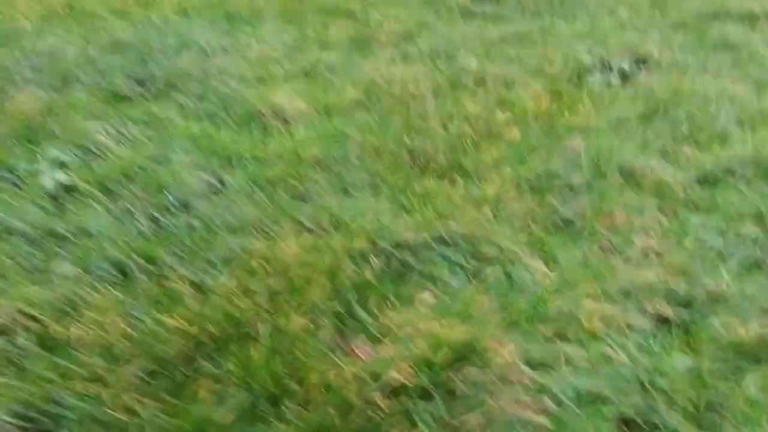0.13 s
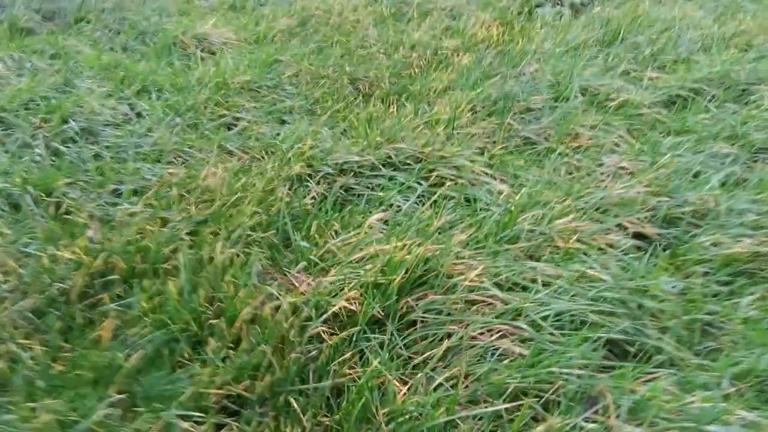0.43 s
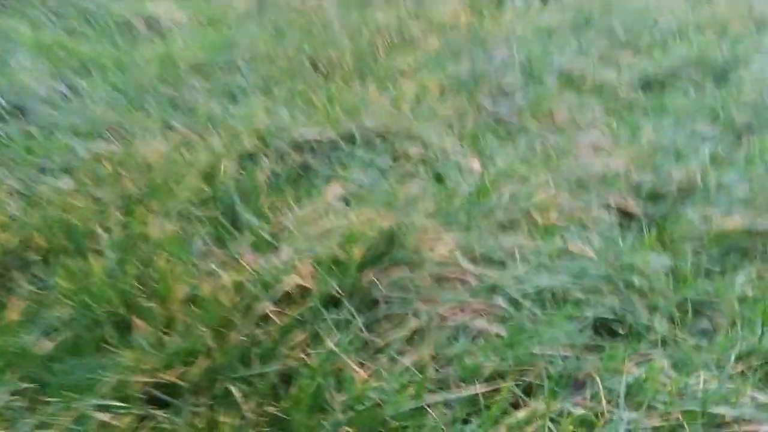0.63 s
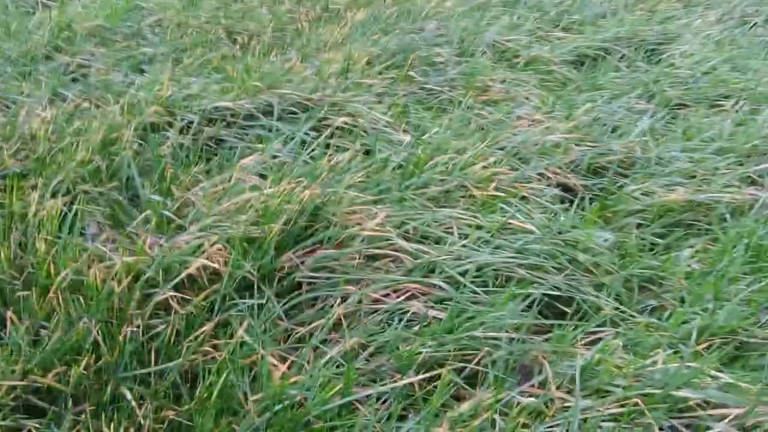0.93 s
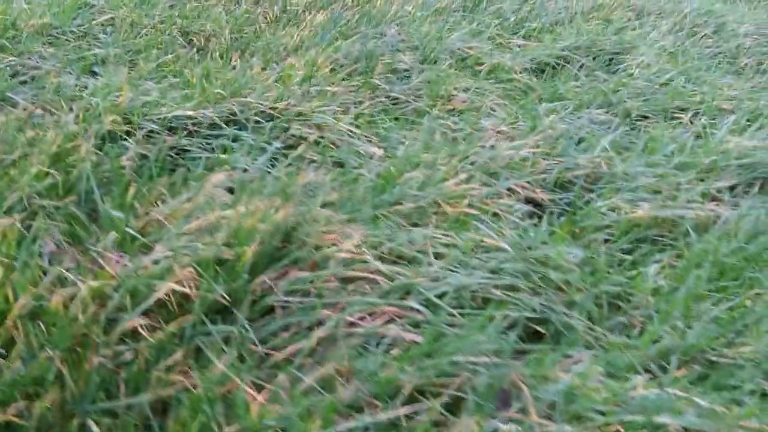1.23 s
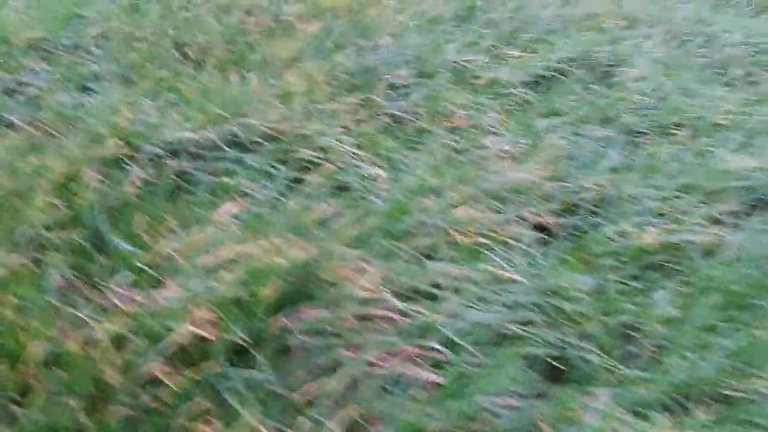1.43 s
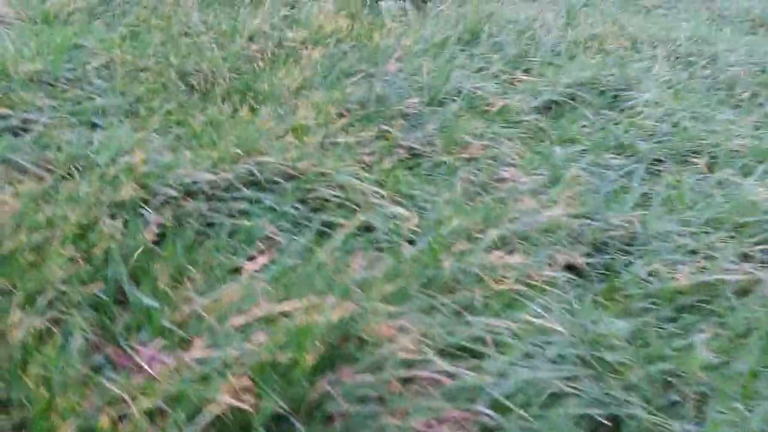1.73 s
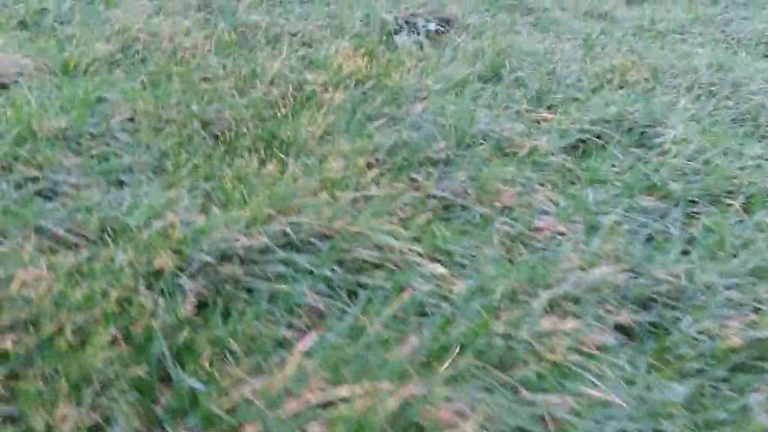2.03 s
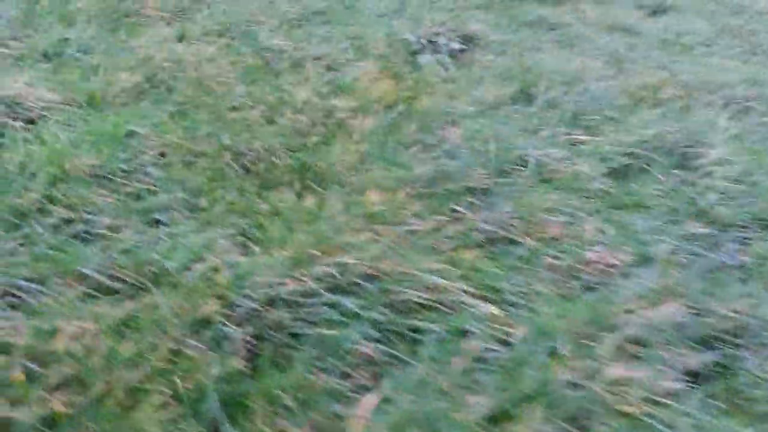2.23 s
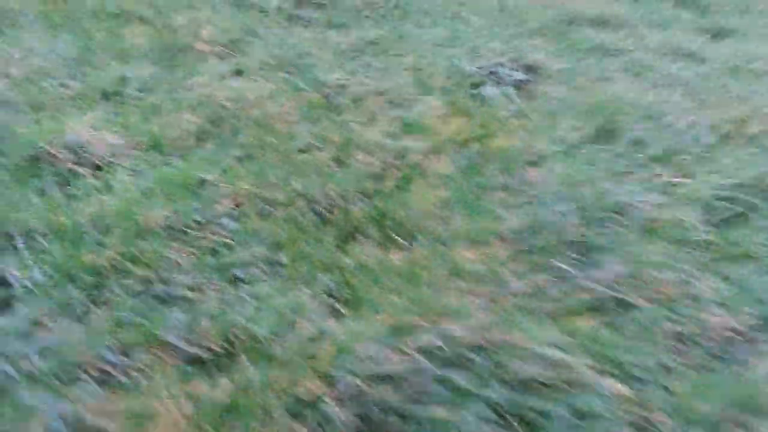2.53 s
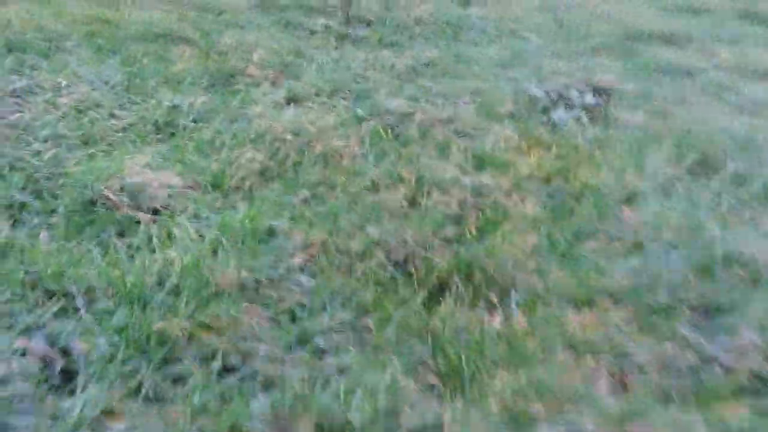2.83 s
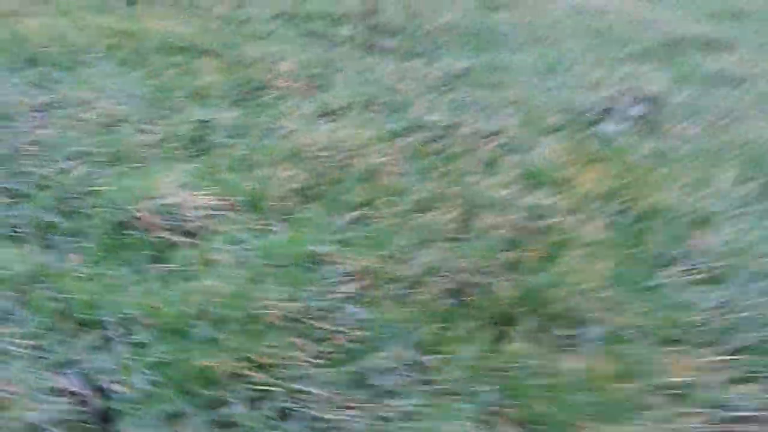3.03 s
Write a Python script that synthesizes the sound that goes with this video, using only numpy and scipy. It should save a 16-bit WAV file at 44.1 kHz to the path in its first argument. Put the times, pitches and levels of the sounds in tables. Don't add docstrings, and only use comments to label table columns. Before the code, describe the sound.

Someone walks briskly through wet grass, blades swishing, stems cracking and drops ticking, with a quieter gap midway and louder bursts near the end; wind thumps softly on a close, slightly dull mono microphone outdoors.

```python
import sys
import numpy as np
from scipy import signal
from scipy.io import wavfile

SR = 44100
rng = np.random.default_rng(int(sys.argv[2]) if len(sys.argv) > 2 else 0)


def log_audio(samples):
    frames = np.atleast_2d(samples).T
    limited = np.clip(frames, -1, 1)
    pcm = np.round(limited * 32767).astype(np.int16)
    wavfile.write(sys.argv[1], SR, pcm)


def field_ratio(decibels):
    return 10 ** (np.asarray(decibels, dtype=float) / 20)


N = 141120

# start_s, peak_db, ring_hz, knock_db, spray_db (last two relative to the peak)
STEM_SNAPS = [(0.117, -23.5, 4160, -16, -27.5), (0.2345, -11, 2320, -17, -30.5),
              (0.3142, -24, 3660, -9.5, -53), (0.783, -13, 4660, -21, -28.5), (0.863, -23, 2320, -25, -54),
              (0.8911, -12.5, 2320, -33, -50), (0.9188, -12, 3200, -24, -29),
              (0.968, -13.5, 4400, -45, -27), (1.011, -11, 3350, -23, -24), (1.1255, -16.5, 2520, -44, -56),
              (1.21, -23.5, 4150, -42, -16.5), (1.2941, -15, 4200, -28.5, -47),
              (1.384, -16, 4370, -30, -30.5), (1.468, -14, 4040, -53, -65), (1.8119, -4, 2490, -17, -24.5),
              (1.9735, -8.5, 3940, -33, -31), (2.0502, -10, 3700, -10.5, -18),
              (2.1114, -11, 3700, -16.5, -14.5), (2.5743, -13, 2050, -14.5, -4),
              (2.795, -1, 3880, -22, -32.5), (3.019, -17, 1990, -12, -16.5), (3.1049, -3.5, 2080, -28, -31)]


def rms_one(x):
    return x / np.sqrt(np.mean(x ** 2) + 1e-20)


def in_time(rows):
    s, *columns = np.transpose(rows)
    return [np.interp(np.arange(N) / SR, s, c) for c in columns]


def drift(rate_hz):
    hop, settle = 40, 2000
    r = np.exp(-2 * np.pi * rate_hz * hop / SR)
    noise = rng.standard_normal(N // hop + settle + 2)
    slow = signal.lfilter([1], [1, -2 * r, r * r], noise)[settle:]
    return np.interp(np.arange(N) / hop, np.arange(len(slow)), rms_one(slow))


def band(x, low_hz, high_hz, order=2):
    return signal.sosfilt(signal.butter(order, [low_hz, high_hz], "band", fs=SR, output="sos"), x)


def lowpass(x, edge_hz, order):
    return signal.sosfilt(signal.butter(order, edge_hz, fs=SR, output="sos"), x)


def ring(hz, cycles):
    turns = np.arange(1024) / SR * hz
    out = np.sin(2 * np.pi * turns) * turns * np.exp(-turns / cycles * 3)
    return out / np.abs(out).max()


def bank(sources, spectrum, patchy_db, rate_hz, tilt_db=0, knee_hz=1):
    hz, db = np.transpose(spectrum)
    edges = np.geomspace(hz[0], hz[-1], int(3 * np.log2(hz[-1] / hz[0])) + 2)
    out, power = 0, 0
    for k, (low, high) in enumerate(zip(edges, edges[1:])):
        mid = np.sqrt(low * high)
        gain = field_ratio(np.interp(np.log(mid), np.log(hz), db))
        lean_db = tilt_db * max(np.log2(mid / knee_hz), 0)
        noise = rms_one(band(sources[k % 2], low, high))
        out = out + gain * np.sqrt(high - low) * noise * field_ratio(lean_db + patchy_db * drift(rate_hz))
        power += gain ** 2 * (high - low)
    return out / np.sqrt(power)


def wind():
    # start_s, level_db, brightness_db
    gusts = [(0, -22.5, -12.5), (.5, -19, -12), (.9, -23.5, -9.5), (.97, -21.5, -19), (1.44, -21, -10.5),
             (1.59, -35.5, -18), (2.13, -20.5, -16.5), (2.24, -36, -35), (2.45, -26.5, -15.5),
             (2.67, -19.5, -11), (3.2, -21.5, -19.5)]
    # centre_s, length_s, lift_db
    buffets = [(0.11, 0.12, 8), (0.249, 0.052, 10.5), (0.338, 0.12, -4), (0.475, 0.013, -1.5),
               (0.553, 0.063, 3.5), (0.63, 0.011, 2.5), (0.825, 0.17, 7), (0.951, 0.02, -9.5),
               (1.037, 0.018, 5), (1.071, 0.019, -14.5), (1.149, 0.028, 5.5), (1.316, 0.054, 7.5),
               (1.377, 0.028, 0.5), (1.495, 0.072, 7.5), (1.709, 0.021, 6.5), (1.831, 0.016, -2.5),
               (1.924, 0.01, 6.5), (2.006, 0.039, 6.5), (2.116, 0.068, 4.5), (2.214, 0.027, 1.5),
               (2.545, 0.017, 5), (2.591, 0.017, -10), (2.631, 0.044, 6.5), (2.725, 0.03, 6.5),
               (2.821, 0.032, -14), (2.932, 0.042, 11.5), (3.073, 0.018, -1.5), (3.138, 0.044, 7)]
    # pitch_hz, density_db (per Hz)
    rumble = [(25, -41.5), (40, -47), (62, -0.5), (130, 4.5), (243, -4), (436, -16.5), (700, -35.5),
              (1100, -46.5)]
    lumpy_db, patchy_db, trim_db, knee_hz = 3.0, 2, -3.5, 195
    level_db, bright_db = in_time(gusts)
    t = np.arange(N) / SR
    lift_db = sum(db * np.exp(-.5 * ((t - s) / length * 2) ** 2) for s, length, db in buffets)
    eddies = rng.standard_normal((2, N)) * field_ratio(lumpy_db * drift(38))
    tilt_db = 1.206 * (bright_db - bright_db.mean()) + 0.38 * lift_db
    turbulence = bank(eddies, rumble, patchy_db, 10.0, tilt_db, knee_hz)
    buffeting = field_ratio(level_db + lift_db + trim_db) * turbulence
    return band(lowpass(buffeting, 1110, order=9), 39, 4200)


def open_air():
    hiss = rms_one(band(rng.standard_normal(N), 700, 5000, order=5))
    return field_ratio(-74 + 2 * drift(9)) * hiss


def port(x):
    ring_hz, width_hz, lift, edge_hz = 4100, 1800, 0.54, 4586
    lifted = x + lift * band(x, ring_hz - width_hz / 2, ring_hz + width_hz / 2, order=1)
    return lowpass(lifted, edge_hz, order=8)


def grains():
    grains_per_s, spread_db, grain_share, clump_db = 1600, 6.5, 0.4, 2
    crackle_per_s, crackle_share = 270, 0.33
    sizes = field_ratio(spread_db * np.minimum(rng.exponential(1, N), 5)) * rng.choice([-1, 1], N)
    born = rng.random(N) < grains_per_s * field_ratio(clump_db * drift(30)) / SR
    crackle = rng.standard_normal((2, N)) * (rng.random((2, N)) < crackle_per_s / SR)
    hiss = rng.standard_normal((2, N))
    fine = np.sqrt(grain_share) * rms_one(sizes * born) + np.sqrt(1 - grain_share) * hiss
    return fine + np.sqrt(crackle_share) * rms_one(crackle)


def stroke(s, length):
    attack_s, swell, sag_db, release_s = 0.00088, .1, 3, 0.037
    t = np.arange(N) / SR - s
    rise = np.clip(t / (attack_s + swell * length), 0, 1)
    sag = field_ratio(-sag_db * t.clip(0, length) / length)
    return rise * sag * np.exp(-(t - length).clip(0) / release_s)


def brush(blades, s, length, low_hz, high_hz, db):
    streak_width_hz, streak_lift, patchy_db = 200, .55, 1.5
    hiss = band(blades, low_hz, high_hz, order=4)
    for hz in low_hz * (high_hz / low_hz) ** rng.random(4):
        streak = band(hiss, hz - streak_width_hz / 2, hz + streak_width_hz / 2, order=1)
        hiss = hiss + streak_lift * field_ratio(6 * drift(18)) * streak
    return field_ratio(db + patchy_db * drift(20)) * stroke(s, length) * rms_one(hiss)


def spring_back(blades):
    tail_db, follows, tail_s = -47.5, 0.83, 0.011
    kicks = np.zeros(N)
    for s, db, *_ in STEM_SNAPS:
        kicks[int(s * SR)] = field_ratio(tail_db + follows * (db + 15))
    fading = signal.lfilter([1], [1, -np.exp(-1 / (tail_s * SR))], kicks)
    return fading * rms_one(band(blades, 1700, 3950, order=4))


def swish():
    # start_s, length_s, low_hz, high_hz, level_db
    leg_brushes = [(0, 0.009, 3560, 5220, -52.5), (.03, 0.054, 1200, 2256, -50),
                   (.1, 0.074, 3040, 4630, -65), (.21, 0.078, 4340, 4840, -59.5),
                   (.245, 0.027, 1000, 1550, -41.5), (.26, 0.097, 1000, 4410, -48),
                   (.385, 0.17, 3700, 5400, -63), (.48, 0.16, 1274, 3300, -75.5),
                   (.435, 0.05, 1184, 2670, -50), (.63, 0.079, 4030, 5200, -70),
                   (.765, 0.061, 2790, 5340, -51.5), (.86, 0.19, 1000, 4710, -51.5),
                   (.917, 0.0061, 1000, 8150, -35.5), (1.06, 0.14, 1270, 4900, -55),
                   (1.21, 0.0096, 2800, 5570, -45), (1.295, 0.26, 1770, 4670, -55),
                   (1.805, 0.11, 700, 5200, -43.5), (1.96, 0.22, 2800, 5380, -50.5),
                   (2.05, 0.096, 710, 2040, -42.5), (2.37, 0.23, 1200, 3660, -59),
                   (2.35, 0.23, 4230, 5120, -56.5), (2.37, 0.14, 804, 1140, -51.5),
                   (2.51, 0.18, 900, 4830, -38), (2.68, 0.2, 1840, 5200, -44),
                   (2.79, 0.096, 660, 1900, -41.5), (2.89, 0.17, 3270, 5800, -49),
                   (2.89, 0.81, 690, 1785, -46.5), (3.01, 0.16, 1150, 5400, -39)]
    # start_s, length_s, level_db
    spray_bursts = [(0.11, 0.023, -78), (0.225, 0.045, -75), (0.496, 0.042, -76), (0.762, 0.02, -59.5),
                    (0.937, .11, -64), (1.212, 0.029, -70), (1.797, 0.066, -64), (2.028, .2, -63),
                    (2.369, .2, -64.5), (2.586, 0.26, -55), (2.962, 0.34, -52)]
    blades = grains()
    low = spring_back(blades[1])
    low += sum(brush(blades[k % 2], *row) for k, row in enumerate(leg_brushes))
    high = sum(brush(blades[0], s, length, 5200, 8600, db) for s, length, db in spray_bursts)
    return port(low) + field_ratio(-7.5) * low + high


def squelches():
    # start_s, peak_db, ring_hz
    wet_pockets = [(0.036, -37.5, 1660), (0.06, -32, 1406), (0.06, -35, 2040), (.077, -54, 2130),
                   (.345, -48.5, 4240), (0.366, -39.5, 960), (.386, -38, 3840), (0.387, -40, 4560),
                   (.386, -50, 2900), (.398, -52, 5200), (.398, -62, 6760), (0.418, -49, 3980),
                   (0.441, -32.5, 1430), (0.441, -35.5, 2350), (.44, -48, 3980), (0.455, -41, 1630),
                   (0.456, -38.5, 1000), (0.475, -38, 2280), (0.477, -39, 1510), (0.484, -52, 3870),
                   (.485, -60, 5300), (.499, -45, 4230), (.544, -46, 4650), (.554, -51.5, 5050),
                   (.635, -49, 4900), (.675, -46.5, 4150), (.68, -54.5, 1420), (0.739, -47, 1450),
                   (1.165, -38.5, 2300), (1.309, -48, 2750), (1.433, -49, 2900), (1.513, -60, 6340),
                   (2.273, -47.5, 1000), (2.328, -56, 1000), (2.35, -47, 930), (2.373, -36.5, 846),
                   (2.381, -42, 1420), (2.447, -34, 904), (2.445, -38, 4500), (2.477, -43, 940),
                   (2.513, -32.5, 4450), (2.513, -34.5, 940), (2.535, -42, 1880), (2.628, -31.5, 4500),
                   (2.683, -35, 3180), (2.745, -42, 2150)]
    ring_s, spread, tick_db = .0058, .04, -12
    out = np.zeros(N + 2048)
    detunings = rng.uniform(.3, 1, (len(wet_pockets), 2)) * spread
    for (s, db, hz), (up, down) in zip(wet_pockets, detunings):
        i = int(s * SR)
        pair = ring(hz * (1 + up), ring_s * hz) + ring(hz * (1 - down), ring_s * hz)
        out[i:i + 1024] += field_ratio(db) * (.6 * pair + field_ratio(tick_db) * ring(hz, 2))
    return out[:N]


def snaps():
    # start_s, peak_db, ring_hz
    drop_flicks = [(.049, -54, 4140), (.06, -55, 4240), (0.132, -47, 1300), (.18, -54, 3920),
                   (0.101, -49, 4360), (0.244, -25.5, 3000), (.254, -36, 3030), (.332, -27, 3800),
                   (0.507, -37.5, 6500), (0.767, -30.5, 4420), (0.882, -24, 3930), (0.922, -20, 1190),
                   (0.769, -35, 6570), (0.928, -21, 4200), (1.001, -24.5, 1600), (1.001, -33, 6200),
                   (1.004, -25.5, 3500), (1.07, -30.5, 4400), (1.069, -25, 2360), (1.155, -35.5, 2200),
                   (1.155, -34.5, 3600), (1.218, -26, 3950), (1.249, -49, 3400), (1.26, -39, 4300),
                   (1.352, -29.5, 4100), (1.416, -41.5, 2230), (1.885, -26, 1630), (2.08, -40, 6200),
                   (2.159, -31.5, 4560), (2.205, -30.5, 7150), (2.348, -38.5, 6770), (2.545, -29, 2600),
                   (2.709, -29.5, 3200), (2.76, -27, 4200), (2.785, -24.5, 3940), (2.819, -39, 1700),
                   (2.842, -45, 5500), (2.882, -37, 1480), (2.887, -30, 4600), (2.929, -30, 4260),
                   (3.09, -28.5, 5870), (2.984, -28, 1580)]
    late_s, crack_trim_db, knock_trim_db, spray_trim_db, flick_trim_db = .001, -0.5, 14, 7, 1.5
    low, high = np.zeros((2, N + 2048))
    for s, db, hz, knock_db, spray_db in STEM_SNAPS:
        i = int((s + late_s) * SR)
        crack = ring(hz, 2.63 / 3)
        knock = field_ratio(knock_db + knock_trim_db) * ring(1000, 0.59)
        low[i:i + 1024] += field_ratio(db + crack_trim_db) * (crack + knock)
        high[i:i + 1024] += field_ratio(db + spray_db + spray_trim_db) * ring(6900, 1.34)
    for s, db, hz in drop_flicks:
        i = int(s * SR)
        layer = low if hz < 5500 else high
        layer[i:i + 1024] += field_ratio(db + flick_trim_db) * ring(hz, 5.0 / 3)
    return band(port(low[:N]), 250, 9000) + band(high[:N], 5600, 8300)


def scene():
    return (wind() + open_air() + swish() + squelches() + snaps())[None]


def band_limit(x):
    return signal.sosfilt(signal.butter(12, 8370, fs=SR, output="sos"), x)


def record(dry):
    cut = signal.sosfilt(signal.cheby2(10, 60, 9080, fs=SR, output="sos"), dry)
    return band_limit(cut)


dry = scene()
out = record(dry)
log_audio(out)
```